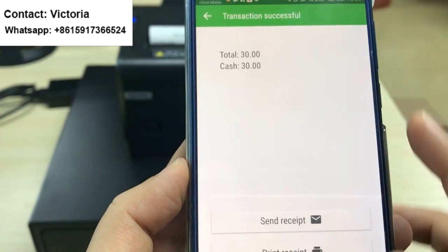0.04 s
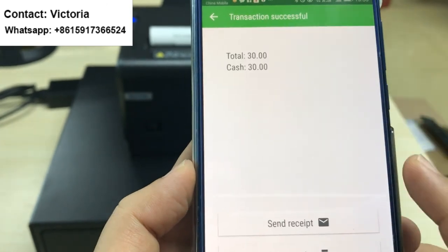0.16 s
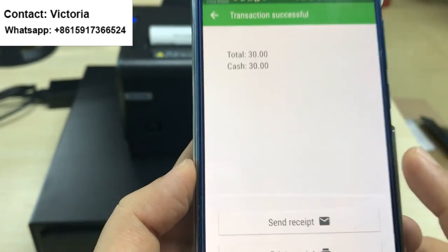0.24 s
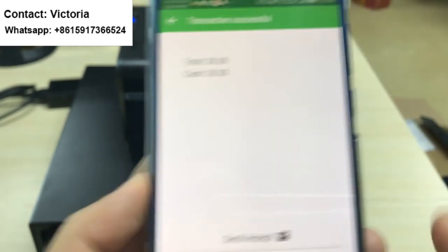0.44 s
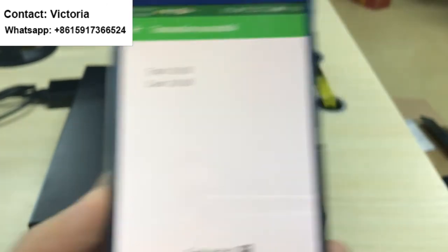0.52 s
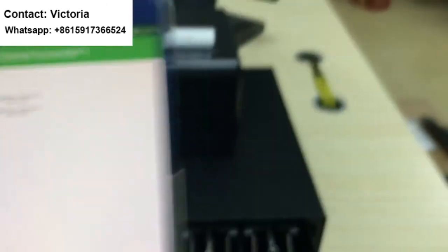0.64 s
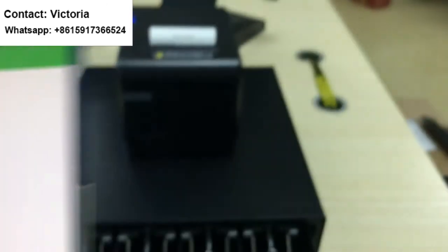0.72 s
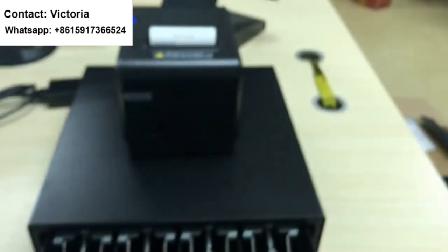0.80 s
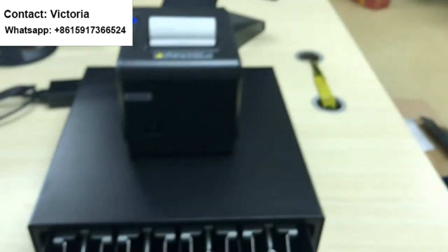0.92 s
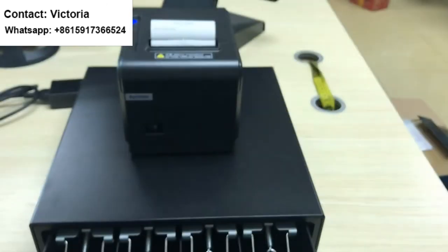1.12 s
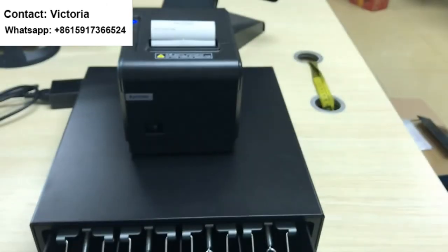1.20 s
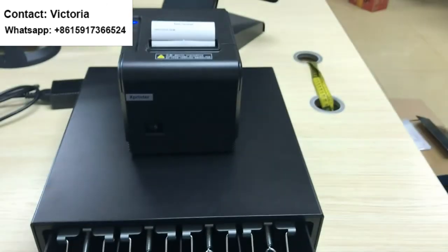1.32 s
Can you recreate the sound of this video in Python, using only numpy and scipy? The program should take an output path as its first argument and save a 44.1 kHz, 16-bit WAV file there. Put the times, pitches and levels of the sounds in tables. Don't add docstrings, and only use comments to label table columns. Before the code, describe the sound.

A metal cash drawer opens, heard close in a small office over soft ventilation noise. At about 0.25 s the latch fires with a sharp double clack and brief rattle. The tray rolls with light bumps until a heavy metallic slam and dull desk thump near 0.63 s. It rebounds; a clip snaps at 0.8 s, a thin scrape leads to clicks around 1.0 s, and a faint tick at 1.26 s.

```python
import sys
import numpy as np
from scipy import signal
from scipy.fft import rfft, irfft
from scipy.io import wavfile
from scipy.ndimage import uniform_filter1d, map_coordinates

SR = 44100
rng = np.random.default_rng(int(sys.argv[2]) if len(sys.argv) > 2 else 0)


def log_audio(samples):
    frames = np.atleast_2d(samples).T
    limited = np.clip(frames, -1, 1)
    pcm = np.round(limited * 32767).astype(np.int16)
    wavfile.write(sys.argv[1], SR, pcm)


def decibels_to_gain(level_db):
    exponent = np.asarray(level_db, float) / 20
    return 10 ** exponent


N = 59535


# pitch_hz, level_db (per Hz)
AIR_TONE = [(20, -9), (45, 0), (172, -10), (319, -12), (527, -17.5), (900, -16), (8500, -36), (11500, -52),
            (16000, -64)]
# start_s, gain_db
GAIN_RISE = [(0, -0.5), (.22, -1), (.6, -2), (1.1, 5.5), (1.35, 6)]
# start_s, level_db
CREAKS = [
    (.05, -49),
    (.169, -47),
    (.53, -42),
    (.57, -42),
    (.8012, -24),
    (1.0262, -27),
    (1.09, -42),
    (1.256, -49),
]
# start_s, level_db, chatter_s, t60_s
LATCH = [(.224, -50.5, 0.0091, 0.06), (.2458, -10, 0.0029, 0.027), (.2488, -12, 0.0027, 0.026),
         (.2875, -25, 0.0022, .012), (.316, -26, 0.005, 0.022), (.258, -21.5, 0.025, 0.095),
         (.322, -19, 0.0067, 0.028), (.397, -35.5, 0.019, 0.037), (.425, -37.5, 0.0081, 0.062),
         (.472, -42.5, 0.0091, 0.05), (.8905, -37, .002, 0.0043), (.8965, -36.5, .002, .006)]
LATCH_TONE = [(59, -23), (100, -18), (229, -5.5), (1010, -5.5), (1390, 1), (2420, -7), (4020, -3),
              (12900, -14.5), (16000, -28.5)]
LATCH_BODY = [(623, 190, 7), (1360, 370, -2), (1740, 120, -3), (3970, 520, 2.5), (4600, 110, -3),
              (5400, 340, 3.5), (7200, 2000, 4)]
# start_s, level_db, chatter_s, t60_s
TICKS = [
    (.2457, -13.5, 0.00072, 0.0024),
    (.8012, -20.5, 0.0017, 0.0023),
    (.803, -32.5, 0.0048, .004),
    (.9985, -35, 0.008, 0.0071),
    (1.0262, -25.5, 0.0046, 0.014),
    (1.256, -48.5, 0.0051, 0.03),
]
TICK_TONE = [(300, -35), (600, 1), (1570, -7.5), (2400, -11.5), (3340, -10), (7400, -10.5), (11000, -29),
             (15500, -36)]
TICK_BODY = [(3370, 220, 10.5), (3900, 160, 11), (5540, 160, 7), (6800, 1200, 2.5), (8670, 340, 6)]
# pitch_hz, level_db, t60_s
PANELS = [
    [(526, 1, 0.047), (934, -1, 0.054), (1234, 0.5, 0.048)],
    [(633, 1.5, 0.075), (694, 5, 0.065), (767.4, -1, 0.16)],
    [(154.6, -10, 0.105), (243.5, -8.5, 0.1), (277, -9.5, 0.12), (317, -11, 0.078), (200, -12, 0.11)],
    [(691, 1, 0.1), (946, -3, 0.069), (1285, -1.5, 0.054), (1544, 6.5, 0.036), (1640, -1.5, 0.055),
     (2310, -9.5, 0.072)],
    [(4277, 4, 0.027), (2275, 3.5, 0.02)],
    [(1117, -3, 0.067), (1382, 1, 0.051), (1646, 1.5, 0.041), (1997, -4, .035), (3910, -6.5, 0.035),
     (4480, -1.5, 0.06), (5350, 0, .035), (7260, 2, 0.023)],
    [(350, -2, 0.051), (486, -3, 0.07), (761.5, 0, 0.064), (945, -5, 0.055), (1234, -1, 0.081),
     (1614, 0, .04), (1713, -4, 0.061), (2050, -4, 0.062)],
    [(920, -3.5, 0.021), (1516, 2, 0.024), (3280, 0.5, 0.021), (5450, -5, .02)],
    [(2305, 1, 0.046), (950, 0.5, 0.047)],
]
# start_s, level_db, rise_s, decay_share
RAIL_KNOCKS = [
    (.472, -17, 0.003, 0.72),
]
# start_s, level_db, rise_s, decay_share
PLATE_KNOCKS = [
    (.321, -29.5, 0.0063, 1),
    (.6255, -11, 0.0014, 0.34),
    (.664, -18, 0.0024, 0.6),
    (.866, -35, .003, .5),
    (.89, -37, .003, 0.6),
    (.912, -32.5, 0.0034, 0.64),
    (.935, -46, .003, .6),
]
# start_s, level_db, rise_s, decay_share
FLOOR_KNOCKS = [
    (.256, -19.5, 0.0036, 1.38),
    (0.409, -29, 0.0014, 1.4),
    (.422, -33, 0.0022, 0.8),
    (0.636, -10.5, 0.0045, 2.1),
    (0.717, -31, 0.0031, 1.1),
    (.999, -28.5, 0.0013, 0.3),
    (1.044, -24, 0.0034, 0.5),
]
BAR_KNOCKS = [
    (1.0275, -22, 0.0021, 0.79),
]
# start_s, level_db, rise_s, decay_share
SPRING_KNOCKS = [
    (.6305, -7.5, 0.001, 0.62),
    (.6935, -28.5, 0.00092, 0.95),
    (.7265, -27, 0.00088, 0.63),
]
# start_s, level_db, rise_s, decay_share
HOOK_KNOCKS = [
    (.2458, -14, 0.00041, 0.82),
    (.249, -15.5, 0.00056, 0.93),
    (.322, -27, 0.0018, 0.6),
]
# start_s, level_db, rise_s, decay_share
CASE_KNOCKS = [
    (.63, -17.5, 0.0023, 1),
    (.636, -19, 0.0028, 1.24),
    (.646, -22.5, 0.0016, .9),
    (.555, -37, .003, .9),
    (.59, -39, .003, 0.68),
    (0.33, -42, 0.0033, .7),
]
# start_s, level_db, rise_s, decay_share
COIN_KNOCKS = [
    (0.803, -20.5, 0.0011, 0.71),
    (.8048, -19, 0.0013, 0.53),
]
# start_s, level_db, rise_s, decay_share
TAB_KNOCKS = [
    (1.256, -40.5, 0.0019, 0.96),
]
# start_s, level_db
ROLL = [(.3, -42.5), (.42, -35.5), (.5, -37), (.58, -35.5), (.75, -39), (.9, -42), (1.2, -58)]
ROLL_TONE = [(35, -44), (60, -17), (257, -5.5), (480, -11), (855, -8), (1100, -8.5), (5300, -24),
             (15000, -41.5)]
ROLL_BODY = [(268, 106, 7), (624, 180, 9.5), (904, 42, 5.5), (1230, 90, -8), (1830, 130, -0.5)]
# start_s, level_db, chatter_s, t60_s
STOP = [
    (.624, -15, 0.0017, 0.021),
    (.629, -13.5, 0.006, 0.05),
    (.641, -20.5, 0.0072, 0.04),
    (.668, -27.5, 0.0036, 0.036),
    (.694, -45, 0.0049, 0.023),
    (.7268, -35, 0.0024, 0.014),
    (.9985, -32.5, 0.006, 0.0064),
]
STOP_TONE = [(45, -19.5), (283, -2), (1100, -8), (2840, -10.5), (4240, -11), (8500, -16), (11000, -27.5),
             (15500, -33)]
STOP_BODY = [(258, 67, -2.5), (710, 230, 4), (1285, 43, 9), (1630, 110, 5), (4070, 1100, -1.5),
             (5260, 120, 0), (8400, 970, -7)]
# start_s, level_db, whistle_hz
SCRAPE = [(.89, -53.5, 9220), (.935, -41, 9000), (.97, -38, 8650), (.99, -37, 7200), (1.0, -53, 6900),
          (1.03, -47.5, 7560), (1.11, -51.5, 8100), (1.15, -58, 7950), (1.3, -63, 8200)]
SCRAPE_TONE = [(900, -39), (1600, -5.5), (5000, -8.5), (8700, -0.5), (11000, -14.5), (14500, -15.5),
               (16000, -32)]
SCRAPE_BODY = [(3250, 400, 11.5), (3950, 620, 13), (5860, 760, 9), (14200, 560, 4.5)]
# pitch_hz, t60_s
OFFICE = [(100, 1), (500, 0.47), (2000, 0.43), (6000, 0.31), (14000, 0.29)]

AIR_DB, HISS_DB = -51, -82
HUM_HZ, HUM_DB, HUM_FROM_S = 84, -47, .55
THUMP_S, THUMP_HZ, THUMP_DB, THUMP_T60_S = .638, 68.2, -25, 0.25
LOOSE_TURNS = .22
BLOWS_WET_DB, SMALL_WET_DB = -6.5, -12
SIDE_DB = -32
GATE_HZ, GATE_DB = 10300, -48.5
GATE_FLOOR_DB, GATE_EAR_HZ, TOP_HZ = -125, 500, 16200
TIME = np.arange(N) / SR


def unit(x):
    return x / np.sqrt(np.mean(x ** 2) + 1e-20)


def along(points, hz):
    f, v = np.transpose(points)
    return np.interp(np.log(hz + 1), np.log(f + 1), v)


def curve(rows, column=1):
    values = [r[column] for r in rows]
    return np.interp(TIME, [r[0] for r in rows], values, left=values[0])


def wobble(rate):
    knots = rng.standard_normal(int(N * rate / SR) + 4)
    return map_coordinates(knots, [np.arange(N) * rate / SR])


def body(x, tone, peaks):
    m = 2 ** 17
    f = np.fft.rfftfreq(m, 1 / SR)
    bumps = sum(decibels_to_gain(db) ** 2 / (1 + (2 * (f - c) / w) ** 2) for c, w, db in peaks)
    cepstrum = irfft(np.log(decibels_to_gain(along(tone, f)) * np.sqrt(1 + bumps) + 1e-6), m)
    cepstrum[1:m // 2] *= 2
    cepstrum[m // 2 + 1:] = 0
    gain = np.exp(rfft(cepstrum))
    return irfft(rfft(x, m) * gain / np.sqrt(np.mean(abs(gain) ** 2)), m)[:N]


def grit(spiky_db):
    sizes = decibels_to_gain(np.clip(spiky_db, 0, 5) * rng.standard_normal(N))
    x = rng.standard_normal(N) * sizes
    return x / np.sqrt(abs(uniform_filter1d(x ** 2, size=130)) + 1e-9)


def chatter(rows, attack_s, spiky_db):
    power = np.zeros(N)
    for start, db, hold, t60 in rows:
        attack = np.exp(np.clip((TIME - start) / attack_s, -40, 0))
        decay = decibels_to_gain(db - 60 * np.clip(TIME - start - hold, 0, 9) / t60)
        power += (decay * attack) ** 2
    return np.sqrt(power) * grit(spiky_db)


def knocks(rows, modes):
    out = np.zeros(N)
    for start, db, rise, share in rows:
        t = np.clip(TIME - start, 0, 9)
        for hz, level_db, t60 in modes:
            phase = hz * t + rng.random() + LOOSE_TURNS * wobble(45)
            decay = decibels_to_gain(db + level_db - 60 * t / (t60 * share))
            out += decay * (1 - np.exp(-t / rise)) * np.sin(2 * np.pi * phase)
    return out


def air():
    level = decibels_to_gain(AIR_DB + curve(GAIN_RISE) + 1.6 * wobble(7.62))
    return level * unit(body(rng.standard_normal(N), AIR_TONE, []))


def creaks_and_hiss():
    clicks = np.zeros(N)
    for start, db in CREAKS:
        clicks[round(start * SR)] = decibels_to_gain(db)
    return np.diff(clicks, prepend=0) + decibels_to_gain(HISS_DB) * rng.standard_normal(N)


def latch():
    return body(chatter(LATCH, 0.0008, spiky_db=3), LATCH_TONE, LATCH_BODY)


def clip_ticks():
    return body(chatter(TICKS, 0.000094, spiky_db=-0.5), TICK_TONE, TICK_BODY)


def panel_rings():
    panel_knocks = [RAIL_KNOCKS, PLATE_KNOCKS, FLOOR_KNOCKS, BAR_KNOCKS, SPRING_KNOCKS,
                    HOOK_KNOCKS, CASE_KNOCKS, COIN_KNOCKS, TAB_KNOCKS]
    return sum(knocks(rows, modes) for rows, modes in zip(panel_knocks, PANELS))


def rolling():
    gate = np.interp(TIME, [.25, .3, 1.1, 1.3], [0, 1, 1, 0])
    level = decibels_to_gain(curve(ROLL) + 0.5 + 1.6 * wobble(60) + .3 * wobble(15))
    return body(gate * level * grit(5.3), ROLL_TONE, ROLL_BODY)


def desk_hum():
    level = decibels_to_gain(HUM_DB + 2.3 * wobble(11.5)) * np.clip((TIME - HUM_FROM_S) / 0.016, 0, 1)
    return level * np.sin(2 * np.pi * (HUM_HZ * TIME + 0.063 * wobble(10.4)))


def end_stop():
    return body(chatter(STOP, 0.00068, spiky_db=3), STOP_TONE, STOP_BODY)


def desk_thump():
    t = np.clip(TIME - THUMP_S, 0, 9)
    thump = decibels_to_gain(THUMP_DB - 60 * t / THUMP_T60_S) * np.sin(2 * np.pi * THUMP_HZ * t)
    shake = decibels_to_gain(-33) * t / 0.014 * np.exp(1 - t / 0.0092) * np.cos(2 * np.pi * 30 * t)
    return thump + shake


def scrape():
    gate = np.interp(TIME, [.84, .87, 1.2, 1.3], [0, 1, 1, 0])
    level = gate * decibels_to_gain(curve(SCRAPE) + 1.2 * wobble(180) + .4 * wobble(50))
    turn = 2 * np.pi * np.cumsum(curve(SCRAPE, column=2)) / SR
    whistle = wobble(1400) * np.sin(turn) + wobble(1400) * np.cos(turn)
    whistle *= decibels_to_gain(-9) * np.interp(TIME, [.9, .95, 1, 1.02], [.3, 1, 1, .3])
    return body(level * grit(3.8), SCRAPE_TONE, SCRAPE_BODY) + level * whistle


def office(x):
    out, step = np.zeros(N), SR // 5
    for k in range(0, N, step):
        hz, t, z = signal.stft(rng.standard_normal(SR // 2), SR, nperseg=256)
        decay = decibels_to_gain(-60 * t / along(OFFICE, hz)[:, None])
        tail = signal.istft(z * decay, SR, nperseg=256)[1]
        tail = np.pad(tail, (250, 0)) / np.linalg.norm(tail)
        wet = signal.fftconvolve(x[k:k + step], tail)[:N - k]
        out[k:k + len(wet)] += wet
    return out


def scene():
    background = air() + creaks_and_hiss()
    blows = latch() + end_stop()
    small = clip_ticks() + panel_rings() + rolling() + scrape()
    room = office(decibels_to_gain(BLOWS_WET_DB) * blows + decibels_to_gain(SMALL_WET_DB) * small)
    mid = background + blows + small + desk_hum() + desk_thump() + room
    side = decibels_to_gain(SIDE_DB) * np.diff(np.roll(mid, 40), prepend=0)
    return np.array([mid + side, mid - side])


def band_limit(x):
    return signal.sosfilt(signal.butter(12, 16490, fs=SR, output="sos"), x)


def record(dry):
    x = dry / (1 + abs(dry / .9) ** 6) ** (1 / 6)
    hz, _, z = signal.stft(x, SR, nperseg=1024)
    power = abs(z.mean(axis=0)) ** 2
    frame_power = power[hz > GATE_EAR_HZ].sum(axis=0)
    threshold = frame_power * decibels_to_gain(GATE_DB) ** 2 + decibels_to_gain(GATE_FLOOR_DB) ** 2
    strong = uniform_filter1d(power, size=24, axis=0) > threshold
    kept = (strong | (hz < GATE_HZ)[:, None]) & (hz < TOP_HZ)[:, None]
    mix = signal.istft(z * kept, SR, nperseg=1024)[1][:, :N]
    return band_limit(mix)


dry = scene()
out = record(dry)
log_audio(out)
```